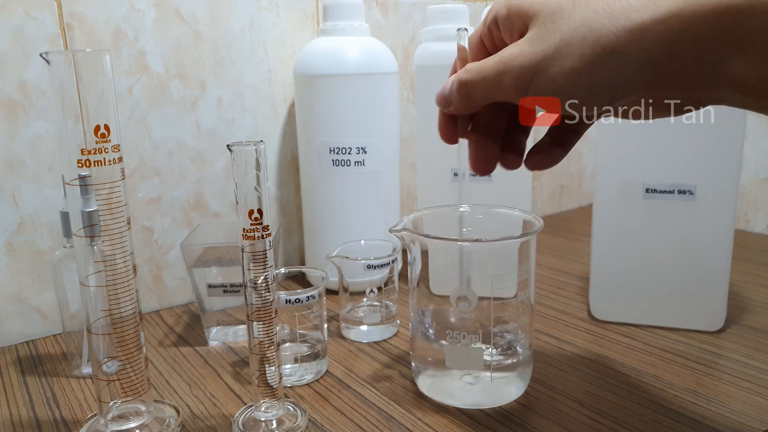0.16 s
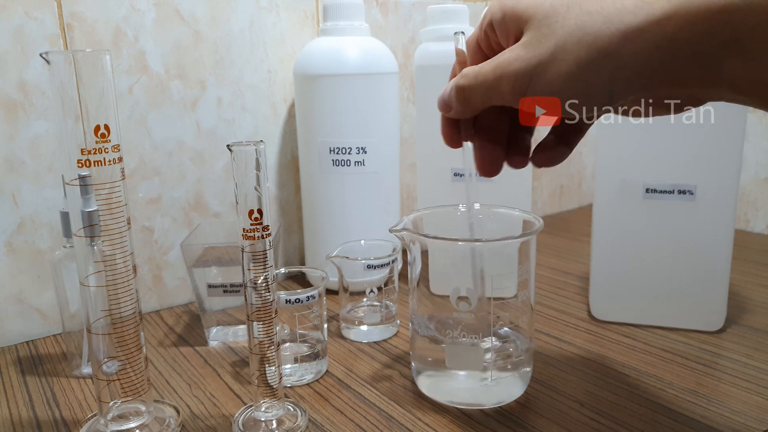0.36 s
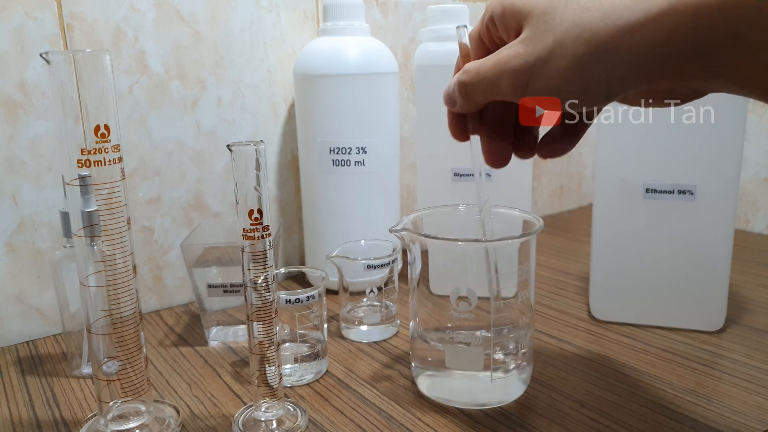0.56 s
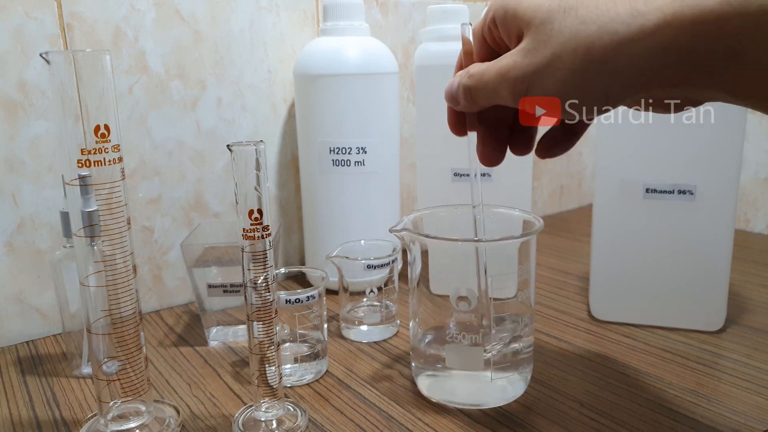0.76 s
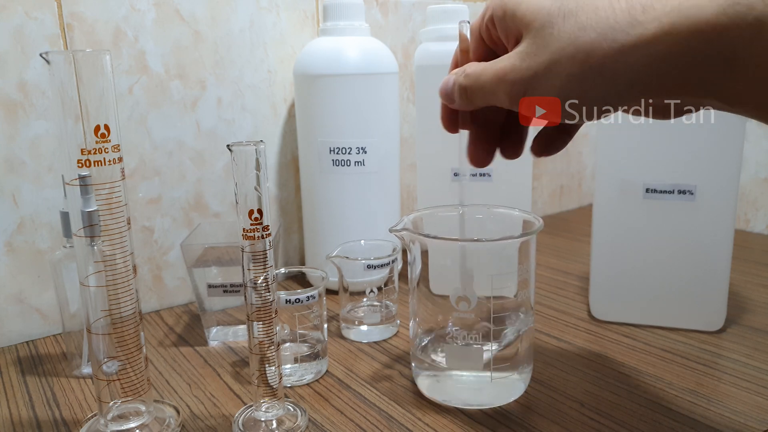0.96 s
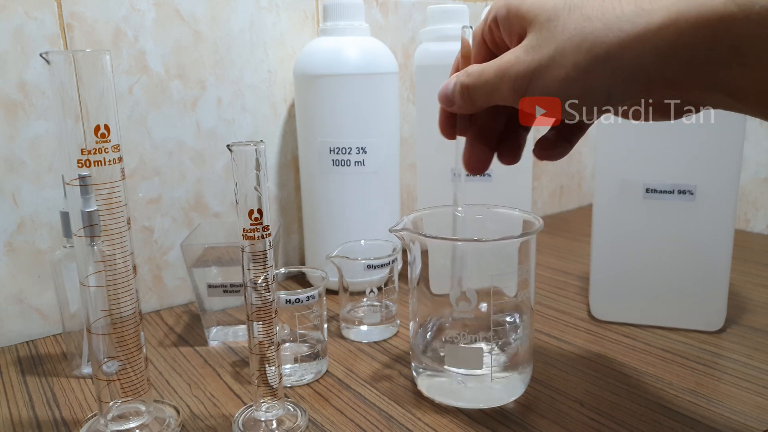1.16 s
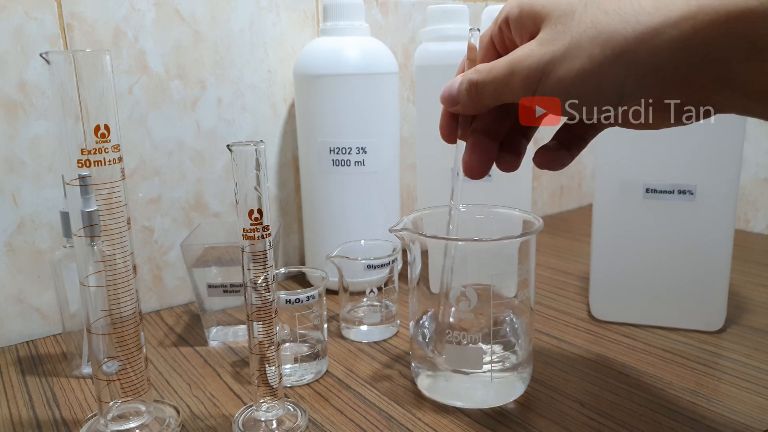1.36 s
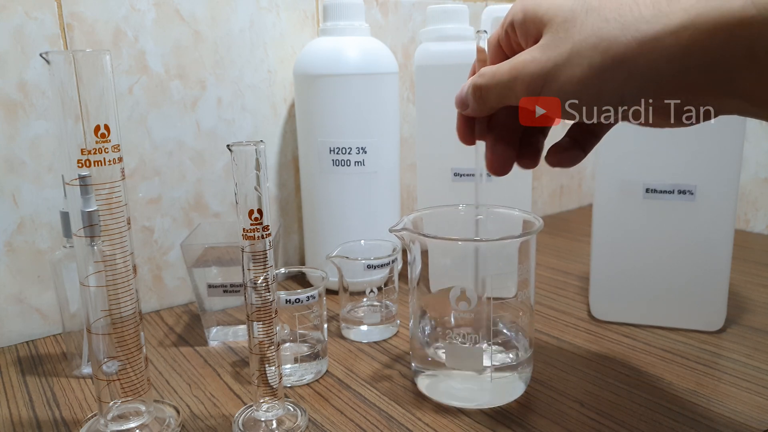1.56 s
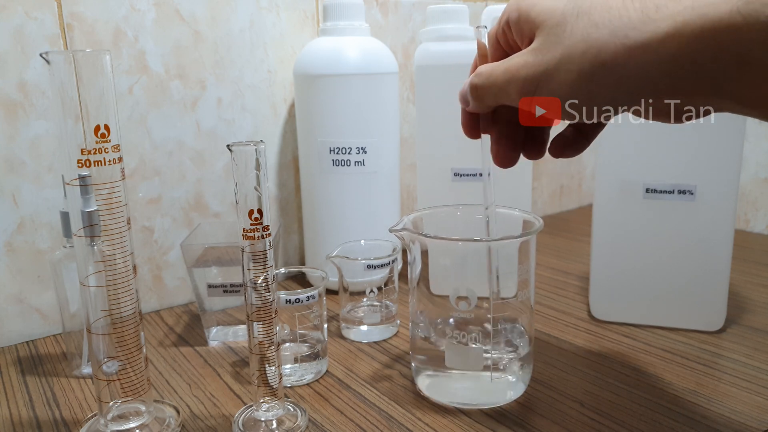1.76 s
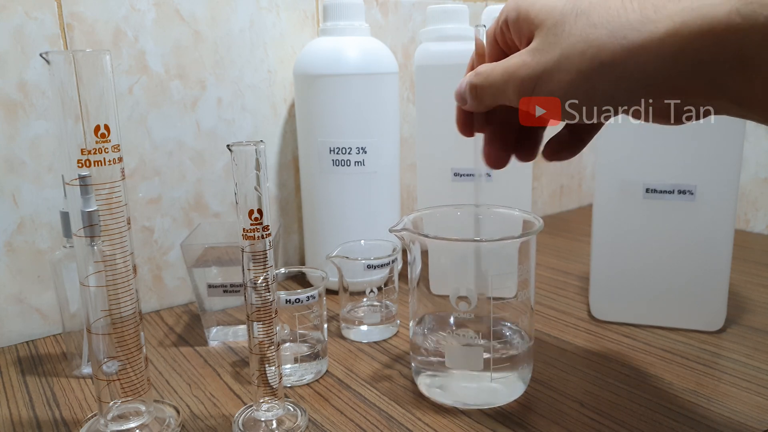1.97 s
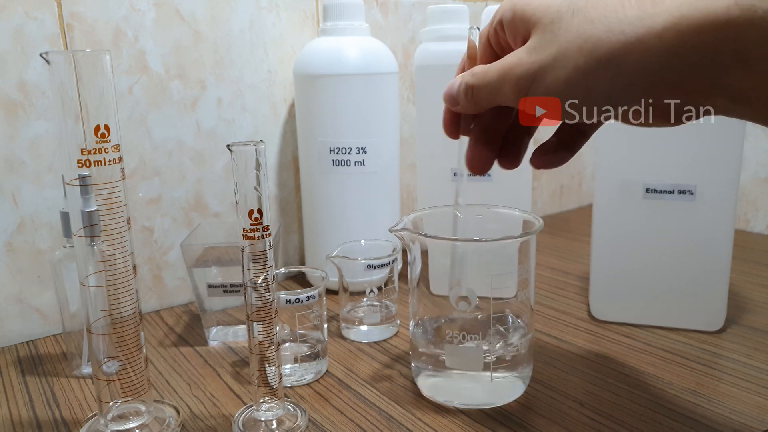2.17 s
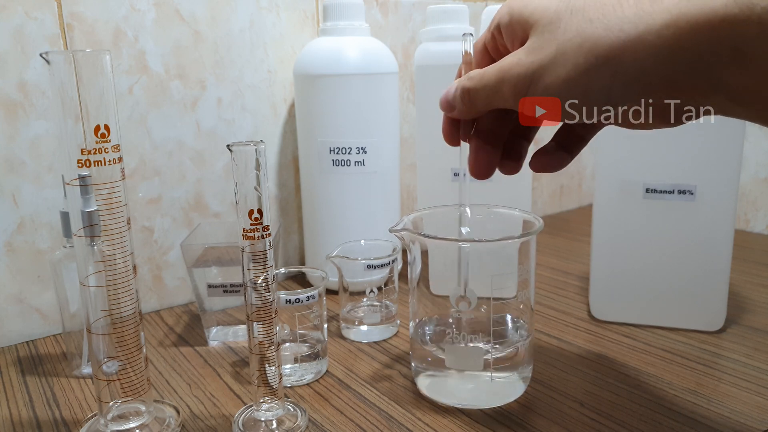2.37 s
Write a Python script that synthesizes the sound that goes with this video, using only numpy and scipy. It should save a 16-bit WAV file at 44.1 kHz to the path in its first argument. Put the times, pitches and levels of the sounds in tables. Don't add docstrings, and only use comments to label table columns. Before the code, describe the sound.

A glass rod clinks rapidly and unevenly against a water-filled glass beaker in a small hard room

```python
import sys
import numpy as np
from scipy import signal
from scipy.fft import rfft, irfft
from scipy.io import wavfile
from scipy.ndimage import uniform_filter1d

SR = 44100
rng = np.random.default_rng(int(sys.argv[2]) if len(sys.argv) > 2 else 0)


def linear_from_db(decibels):
    return 10 ** (np.asarray(decibels, float) / 20)


def master(y):
    cut = np.clip(np.atleast_2d(y).T, -1, 1)
    pcm = np.round(cut * 32767)
    wavfile.write(sys.argv[1], SR, pcm.astype(np.int16))


N = 105840

# pitch_hz, level_db
HUM_SPECTRUM = [(30, -4.5), (48, 2.5), (150, -3), (200, -10.5), (450, -10.5), (1500, -27.5), (4000, -33.5),
                (16000, -44.5)]
# pitch_hz, likeness (0 to 1)
EAR_LIKENESS = [(40, 0.96), (300, 0.86), (1200, 0.13)]
# start_s, wall_db, thud_db, first_rim_db, leading_wall_hz
KNOCKS = [(0.003, -41.5, -74, -49.5, 980), (0.118, -32, -50.5, -37, 1710), (0.273, -25, -35, -34.5, 980),
          (0.458, -21.5, -40, -33.5, 987), (0.667, -36, -55, -39, 1800), (0.878, -15.5, -33.5, -38.5, 1467),
          (1.002, -37, -51.5, -35.5, 1390), (1.17, -21, -36, -28, 1063), (1.317, -26.5, -39.5, -37, 1220),
          (1.378, -21, -38.5, -29, 1440), (1.657, -30.5, -42, -65, 1280), (1.824, -37, -52.5, -47, 970),
          (1.919, -18, -39, -33, 1072), (2.122, -21, -35.5, -33.5, 900), (2.389, -32.5, -47, -40, 1500)]
# start_s, third_rim_db, second_rim_db, leading_third_hz
RINGS = [(0.086, -58, -49, 6840), (0.1176, -16, -35, 6430), (0.2731, -22.5, -34, 6400),
         (0.439, -28.5, -28.5, 6660), (0.46, -21, -30, 6100), (0.6677, -21.5, -33, 5820),
         (0.6884, -26, -43, 5940), (0.8779, -31, -36, 5710), (0.9999, -18.5, -26, 6650),
         (1.0127, -24, -29.5, 5700), (1.1684, -28.5, -31, 5480), (1.3191, -30, -41, 5500),
         (1.3783, -14.5, -24, 6500), (1.6586, -44, -57, 6630), (1.764, -56, -63, 6600),
         (1.8267, -45, -49, 6530), (1.9187, -23, -24, 6900), (2.1236, -32, -33.5, 6000),
         (2.1564, -31.5, -35.5, 6490), (2.3904, -30.5, -38.5, 6630)]
# start_s, middle_db, low_db, top_db, leading_middle_hz
CLINKS = [(0.1175, -10, -19.5, -19, 12200), (0.2733, -37, -41, -37.5, 12800),
          (0.4387, -29, -29, -22, 12200), (0.6679, -24, -22, -8.5, 11500), (0.8782, -31, -44, -23, 11400),
          (1.001, -7, -13.5, -7, 12700), (1.0134, -44.5, -21.5, -19.5, 12900),
          (1.1698, -36, -40, -35, 13470), (1.321, -32, -43.5, -35.5, 11600),
          (1.3765, -15.5, -21, -17.5, 12400), (1.6576, -57, -64.5, -67, 12500),
          (1.8243, -60, -71, -62, 11200), (1.8683, -57, -67, -68, 11200), (1.92, -30.5, -46, -32, 12300),
          (1.884, -65, -70, -62, 12900), (2.0178, -51, -76.5, -50, 13100), (2.121, -30, -38, -34, 11500),
          (2.1566, -34.5, -40, -77, 12200), (2.3904, -43.5, -46.5, -50, 12900)]
# start_s, level_db, pitch_hz,
# t60_s
POPS = [(.004, -50.5, 6680, 0.03), (0.087, -45.5, 1736, 0.059), (0.117, -21, 1880, 0.014),
        (.128, -34.5, 3722, 0.13), (0.182, -38.5, 976, 0.12), (.527, -30, 3250, 0.011),
        (2.122, -35, 2480, 0.14), (.688, -39.5, 3610, 0.095), (.878, -1, 1170, 0.0073),
        (1.003, -28, 8300, 0.036), (1.098, -33, 1760, 0.052), (1.098, -35, 2750, 0.044),
        (1.319, -27, 1357, 0.18), (1.335, -27, 666, 0.05), (1.920, -23, 1072, 0.067),
        (1.859, -43, 3196, 0.053), (1.92, -33.5, 1351, 0.23),
        (0.117, -21.5, 4030, 0.012), (.124, -42, 3556, 0.16), (1.002, -10, 12670, 0.031),
         (0.245, -40, 1200, 0.016), (0.255, -42.5, 1360, 0.053), (0.272, -40.5, 2500, 0.13),
         (0.331, -38, 1080, .04), (.335, -44, 1390, .04), (.438, -48, 3810, 0.022), (.46, -29, 1173, .05),
         (.118, -20, 6500, 0.032), (.667, -18, 4010, 0.011), (.879, -21, 5300, .012),
         (.879, -28, 11000, 0.035), (.882, -22, 1640, .022), (0.882, -30.5, 2900, 0.013),
         (1.002, -43.5, 2940, 0.08), (1.007, -45.5, 1344, 0.36), (1.143, -45, 1010, 0.035),
         (1.174, -35, 2574, 0.036), (1.321, -34.5, 2810, 0.036), (1.325, -37, 3400, 0.033),
         (1.385, -45.5, 3610, 0.13), (1.52, -46.5, 1377, .12), (1.657, -27, 1323, 0.026),
         (1.655, -44, 2617, 0.082), (1.658, -54.5, 10000, .03), (1.659, -47, 4510, 0.047),
         (1.764, -57.5, 4240, 0.05), (1.782, -59.5, 1850, 0.041), (1.776, -59, 10460, 0.078),
         (1.784, -54, 11600, 0.033), (1.81, -41, 990, 0.03), (1.822, -44, 1424, 0.068),
         (1.824, -50.5, 4390, 0.13), (1.826, -56, 10000, .02), (1.846, -48, 1737, 0.044),
         (1.85, -47.5, 3970, 0.023), (1.869, -42, 10320, 0.045), (1.87, -59, 5800, .04),
         (1.894, -56, 14000, .008), (2.157, -27.5, 1320, 0.017), (2.208, -47, 1360, 0.021)]
# pitch_hz, level_db, t60_s
TABLE_MODES = [(425, -1, .09), (505, 2, .09), (660, -8, .09)]
# pitch_hz, level_db, t60_s
WALL_MODES = [(980, -3, 0.12), (1122, 10.5, 0.016), (1219, 1.5, 0.048), (1357, -6, 0.25), (1500, 2, 0.041),
              (1800, 3.5, 0.021)]
# pitch_hz, level_db, t60_s
RIM_FIRST = [(2045, -9, 0.15), (2480, -1.5, 0.046), (2660, -4, 0.026)]
RIM_SECOND = [(3254, -17.5, 0.33), (3610, -25, 0.078), (3722, -4.5, 0.19), (4406, 12.5, 0.022)]
RIM_THIRD = [(5175, -11.5, 0.19), (5728, 3.5, 0.032), (6329, 6.5, 0.03), (6530, -4, 0.12),
             (6600, 4.5, 0.022), (7005, -3, 0.082)]
# pitch_hz, level_db
TIP_LOW = [(8080, -3), (9240, 4), (9365, 4.5), (9450, 4), (10060, 0.5), (10250, -9)]
TIP_MID = [(11000, -11.5), (11250, -12.5), (12180, -4), (12320, -2), (12450, 7), (12630, 1), (12770, 0),
           (13010, 4.5), (13700, -12)]
TIP_TOP = [(14100, -5.5), (14850, -12.5), (15240, -8), (15470, 2), (15650, -11.5)]
TIP_T60_S = 0.041, 0.033, 0.015
# pitch_hz, width_hz, level_db
WEAK_BANDS = [(780, 250, -6), (4080, 150, -7), (5000, 400, -6), (7700, 200, -6), (8650, 600, -10),
              (10600, 300, -13), (11800, 300, -10), (13500, 500, -7), (14500, 300, -8)]
# pitch_hz, t60_s
ROOM_T60 = [(400, 0.49), (4000, 0.41), (16000, 0.29)]

HUM_DB = -57
SCATTER_DB, SLOSH = 4.5, 0.0021
CRACK_S, RISE_S = 0.0066, 0.00016
WAVER_RAD, WAVER_HZ = 0.9, 20
ROOM_DB, ROOM_GAP_S = -9.5, 0.0013


def at_hz(points, hz):
    table_hz, value = np.array(points).T
    return np.interp(np.log(hz), np.log(table_hz), value)


def add(out, s, sound):
    i = int(s * SR)
    out[:, i:i + sound.shape[1]] += sound[:, :out.shape[1] - i]


def bands():
    edges = 30 * 2 ** np.arange(0, 9.3, 0.5)
    return [(np.sqrt(low * high), signal.butter(2, [low, high], "band", fs=SR, output="sos"))
            for low, high in zip(edges, edges[1:])]


def unlike(mid, side, hz):
    alike = np.clip(at_hz(EAR_LIKENESS, hz), 0, 1)
    return np.sqrt(1 + alike) * mid + np.sqrt(1 - alike) * side * [[1], [-1]]


def hum():
    out, white = 0, rng.standard_normal((2, 2, N + 8000))
    for k, (hz, sos) in enumerate(bands()):
        mid, side = signal.sosfilt(sos, white[k % 2])[:, -N:]
        out = out + linear_from_db(at_hz(HUM_SPECTRUM, hz)) * unlike(mid, side, hz)
    return linear_from_db(HUM_DB) * out / np.sqrt(np.mean(out ** 2))


def waver(t, count):
    rate = WAVER_HZ * rng.uniform(0.47, 1.55, (2, count, 1))
    start = rng.uniform(0, 2 * np.pi, (2, count, 1))
    coarse = t[::32]
    bend = WAVER_RAD * np.sin(2 * np.pi * rate * coarse + start).sum(axis=0)
    return np.array([np.interp(t, coarse, row) for row in bend])


def strike(times, levels_db, modes, gain_db, crack_db, spread, apart=0, left_db=0, wet=1,
           cycles=0.067, leads_hz=None, lead_db=0):
    hz, db, t60 = np.transpose(modes)[:, :, None]
    out, t = np.zeros((2, N)), np.arange(SR // 6) / SR
    edges = [hz.min() * 0.77, min(hz.max() * 1.216, 19000)]
    sos = signal.butter(2, edges, "band", fs=SR, output="sos")
    fade = linear_from_db(-60 * t / t60)
    rise = 1 - np.exp(-t / (RISE_S + cycles / hz.min()))
    for k, s in enumerate(times):
        strength, detune, start, phase, pan = rng.standard_normal((5, len(modes), 1))
        level = db + wet * SCATTER_DB * strength
        if leads_hz is not None:
            distance = abs(np.log2(hz / leads_hz[k])) / np.log2(hz.max() / hz.min())
            level = level - lead_db * np.minimum(4 * distance, 1)
        gain = linear_from_db(level) / np.sqrt(np.sum(linear_from_db(level) ** 2))
        turn = 2 * np.pi * hz * (1 + SLOSH * detune) * t + 9 * start
        turn = turn + wet * waver(t, count=len(modes))
        ring = []
        for side in (1, -1):
            balance = linear_from_db(side * (2 * pan + left_db))
            tones = np.sin(turn + side * (spread * phase + apart))
            ring.append(np.sum(gain * balance * fade * tones, axis=0))
        noise = rng.standard_normal((3, len(t)))
        crack = signal.sosfilt(sos, noise[0] + spread * noise[1:]) * np.exp(-t / CRACK_S)
        crack = crack * np.sqrt(SR / 2 / np.ptp(hz))
        add(out, s, linear_from_db(levels_db[k] + gain_db) * rise * (np.array(ring) + linear_from_db(crack_db) * crack))
    return out


def beaker_wall():
    s, wall_db, _, _, lead_hz = np.transpose(KNOCKS)
    return strike(s, wall_db, WALL_MODES, gain_db=2.0, crack_db=-23, spread=0.22, apart=0.54,
                  leads_hz=lead_hz, lead_db=10.5)


def beaker_rim():
    s, _, _, first_db, _ = np.transpose(KNOCKS)
    out = strike(s, first_db, RIM_FIRST, gain_db=-0.5, crack_db=-16, spread=0.27, apart=1.0)
    s, third_db, second_db, lead_hz = np.transpose(RINGS)
    out += strike(s, second_db, RIM_SECOND, gain_db=-2.5, crack_db=-14, spread=0.86, apart=0.84)
    out += strike(s, third_db, RIM_THIRD, gain_db=-1.5, crack_db=-15.5, spread=0.59, apart=0.67,
                  leads_hz=lead_hz, lead_db=11.0)
    return out


def bubbles():
    out, t = np.zeros((2, N)), np.arange(SR // 5) / SR
    rise = 1 - np.exp(-t / 0.0012)
    for s, db, hz, t60 in POPS:
        bend, throb = waver(t, count=2)
        ear_phase = [[0], [rng.normal(0, 0.96)]]
        tone = np.sin(2 * np.pi * hz * t + bend + ear_phase)
        add(out, s, linear_from_db(db - 60 * t / t60 + 4.0 * throb) * rise * tone)
    return out


def hollows(x):
    for mid_hz, width_hz, db in WEAK_BANDS:
        x = x - (1 - linear_from_db(db)) * signal.lfilter(*signal.iirpeak(mid_hz, mid_hz / width_hz, fs=SR), x)
    return x


def room(x):
    t, tail = np.arange(SR // 2) / SR, 0
    white = rng.standard_normal((2, 2, len(t)))
    for k, (hz, sos) in enumerate(bands()):
        mid, side = signal.sosfilt(sos, white[k % 2])
        tail = tail + unlike(mid, side, hz) * linear_from_db(-60 * t / at_hz(ROOM_T60, hz))
    tail = tail * np.clip(t / ROOM_GAP_S - 1, 0, 1) / np.sqrt(np.sum(tail ** 2) / 2)
    answer = rfft(tail)
    power = abs(answer) ** 2
    broad, narrow = [uniform_filter1d(power, size=size, axis=1) for size in (301, 21)]
    tail = irfft(answer * np.sqrt(broad / narrow))
    return linear_from_db(ROOM_DB) * signal.fftconvolve(x, tail[:, :SR // 3], axes=1)[:, :N]


def table_thud():
    s, _, thud_db, _, _ = np.transpose(KNOCKS)
    return strike(s + 0.00229, thud_db, TABLE_MODES, gain_db=11, crack_db=-39, spread=0.25,
                  left_db=0.1, wet=0, cycles=1.6)


def rod_tip():
    s, mid_db, low_db, top_db, lead_hz = np.transpose(CLINKS)
    families = zip((TIP_LOW, TIP_MID, TIP_TOP), TIP_T60_S)
    low, mid, top = [[(*mode, t60) for mode in modes] for modes, t60 in families]
    out = strike(s, low_db, low, gain_db=1.5, crack_db=-23.0, spread=0.82, apart=1.13)
    out += strike(s, mid_db, mid, gain_db=-3.0, crack_db=-14, spread=1.0, apart=0.79, left_db=-1.5,
                  leads_hz=lead_hz, lead_db=7.0)
    out += strike(s, top_db, top, gain_db=-4, crack_db=-14.5, spread=1.0, apart=0.9, left_db=-7.5)
    return out


def scene():
    beaker = hollows(beaker_wall() + beaker_rim() + bubbles() + table_thud() + rod_tip())
    return beaker + room(beaker) + hum()


def top_cut(x):
    return signal.sosfilt(signal.butter(12, 16990, fs=SR, output="sos"), x)


def record(dry):
    mix = 0.94 * np.tanh(dry / 0.79)
    return top_cut(mix)


dry = scene()
out = record(dry)
master(out)
```